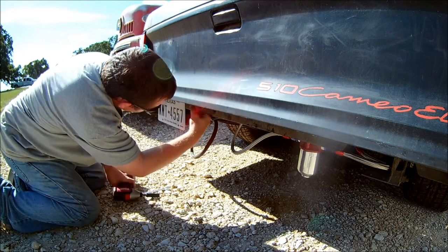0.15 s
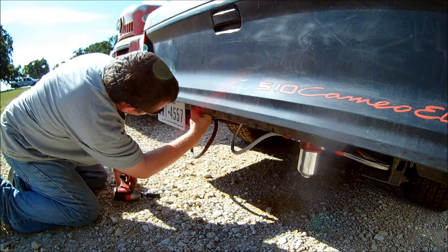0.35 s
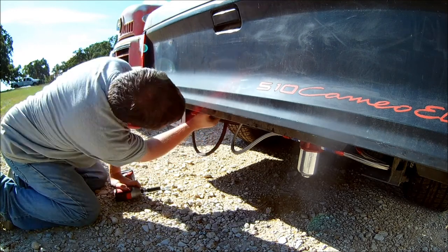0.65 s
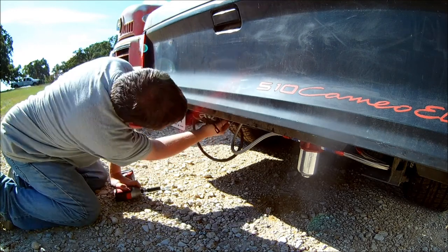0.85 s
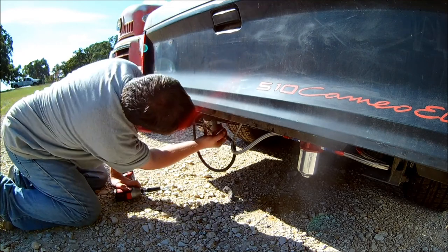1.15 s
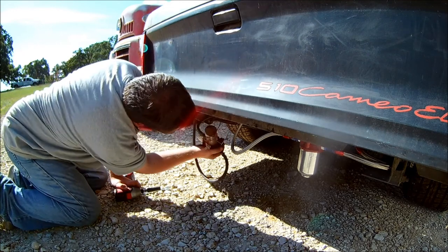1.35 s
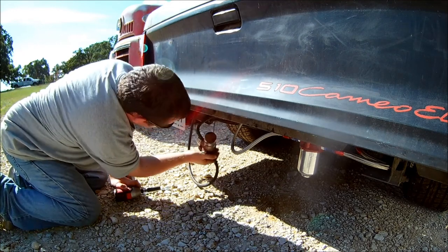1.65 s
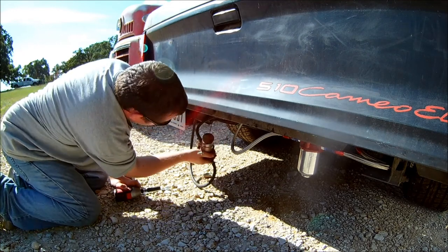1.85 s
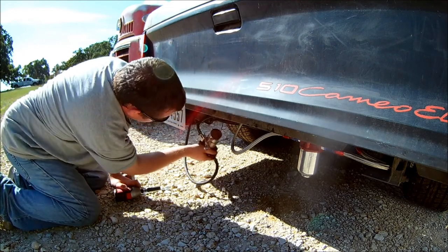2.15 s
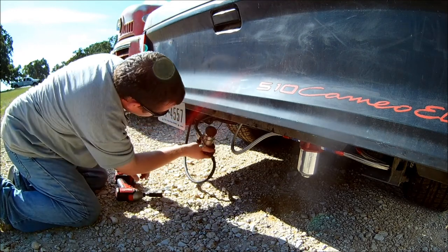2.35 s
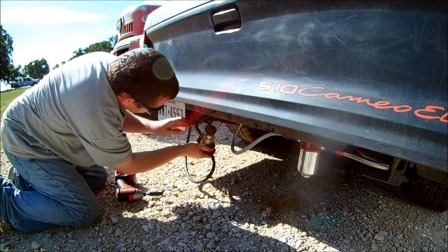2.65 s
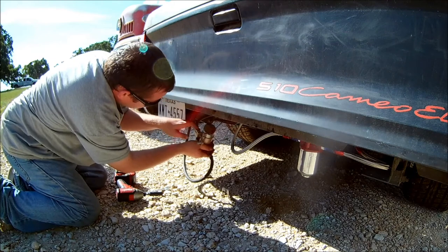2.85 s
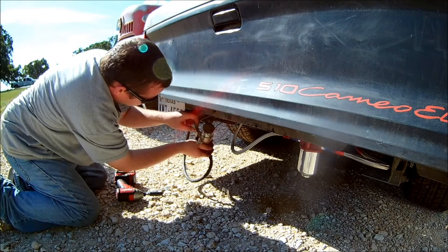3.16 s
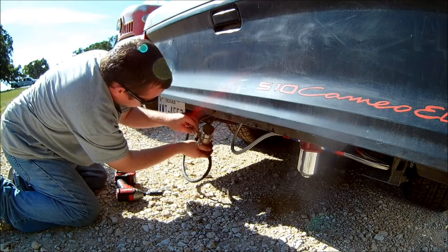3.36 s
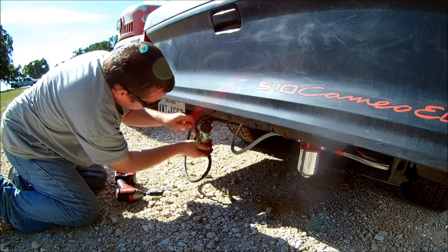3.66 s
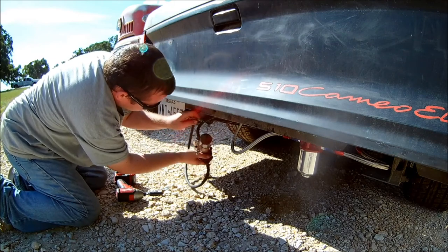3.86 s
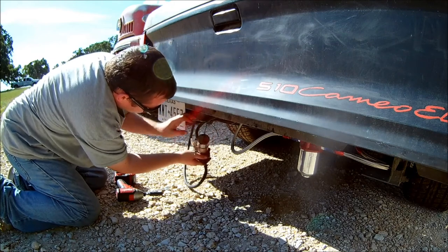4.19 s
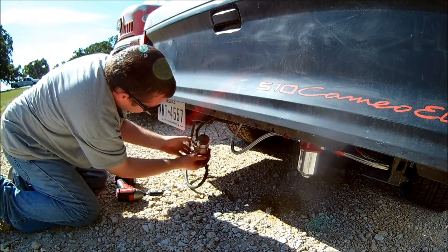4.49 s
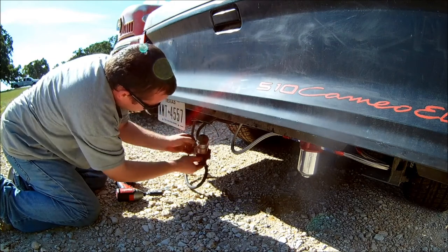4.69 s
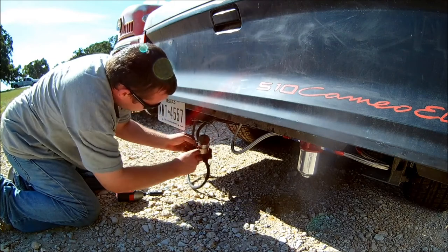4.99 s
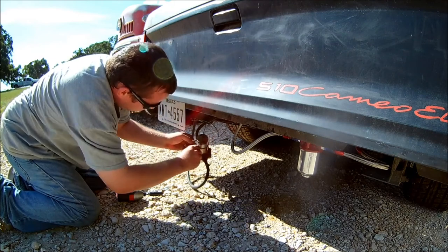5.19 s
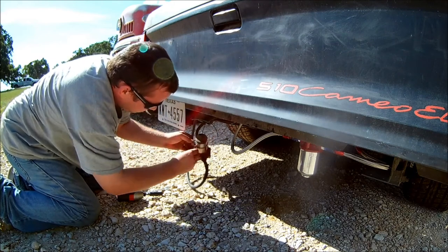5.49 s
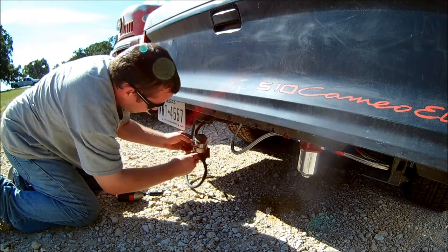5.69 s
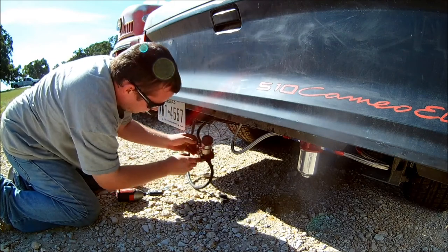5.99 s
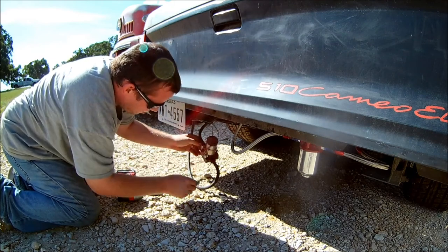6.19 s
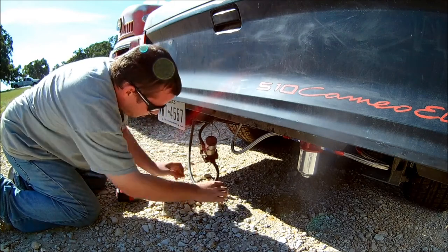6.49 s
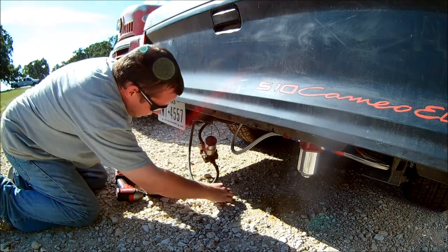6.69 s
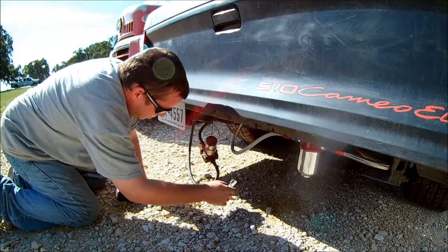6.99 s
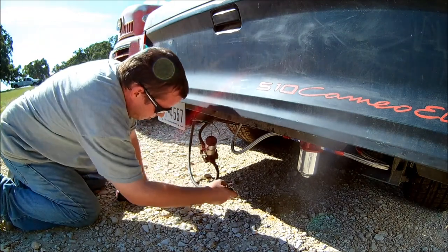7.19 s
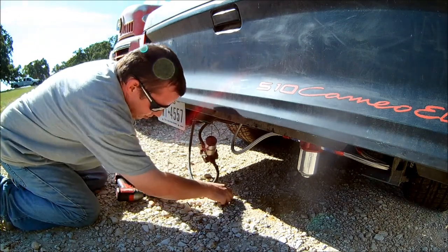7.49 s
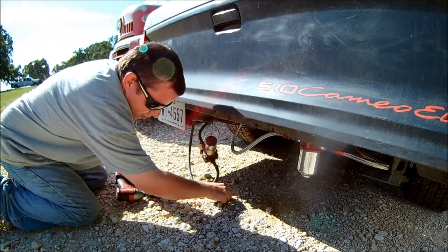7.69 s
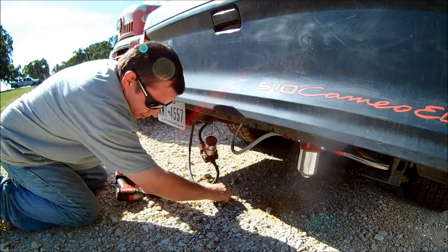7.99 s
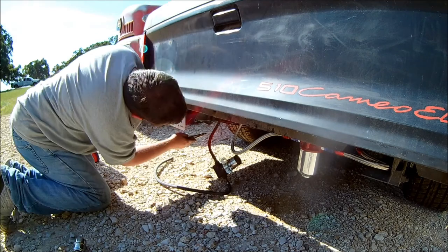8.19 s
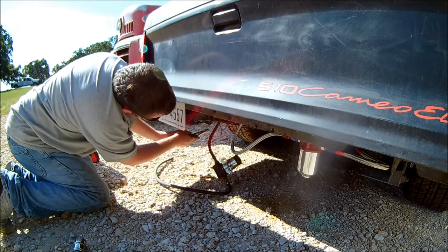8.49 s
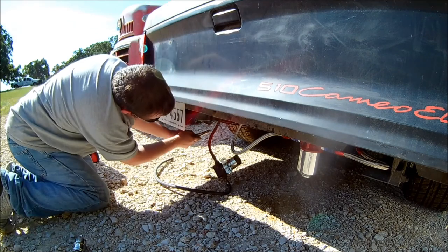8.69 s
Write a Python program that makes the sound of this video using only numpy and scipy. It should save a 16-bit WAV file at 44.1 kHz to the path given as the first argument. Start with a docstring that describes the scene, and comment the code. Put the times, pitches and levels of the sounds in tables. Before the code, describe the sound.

Outdoors behind an idling pickup, a steady low-mid engine hum with a thin whine and rushing cooling air runs throughout. Early on there is a faint tick, a light tap, then a short hoarse metal scrape ending in a hard clunk with a brief ring. Soft breeze bumps the microphone; near the end a rough gust surges over it for over a second, then the engine drone is left alone.

```python
"""Hose fitting on a pickup's bumper

Outdoors behind a parked pickup with its engine running: sine tones locked to one shaft make the hum and whine,
and pulsing noise makes the rush of cooling air. A metal fitting on a hose scrapes along the bumper (noise
with a hoarse squeal) and clunks against it (clatter and ringing modes); faint ticks are short noise bands.
Low noise bumps the microphone in wafts of breeze; one rough gust adds surging noise and pressure pulses."""
import sys
import numpy as np
from scipy import signal
from scipy.fft import rfft, irfft, next_fast_len
from scipy.io import wavfile
from scipy.ndimage import map_coordinates

SR = 44100
rng = np.random.default_rng(int(sys.argv[2]) if len(sys.argv) > 2 else 0)


def waveform_to_disk(signal):
    """Save audio, clipped to [-1, 1], as 16-bit WAV at the path in sys.argv[1]."""
    frames = np.transpose(np.atleast_2d(signal))
    scaled = np.clip(frames, -1, 1) * 32767
    samples = np.round(scaled).astype(np.int16)
    wavfile.write(sys.argv[1], SR, samples)


N = 390285  # samples, about 8.85 s


def amp(db):
    """Convert decibels to gain."""
    return 10 ** (np.asarray(db) / 20)


def unit(x):
    """Scale to rms 1."""
    return x / np.sqrt(np.mean(x ** 2) + 1e-20)


def along(points, hz):
    """Read (Hz, value) points on a log frequency axis."""
    point_hz, values = np.transpose(points)
    return np.interp(np.log(hz + 1), np.log(point_hz + 1), values)


def curves(rows):
    """Draw one value per sample for each column after the time."""
    times, *columns = np.transpose(rows)
    return [np.interp(np.arange(N) / SR, times, column) for column in columns]


def wobble(rate_hz):
    """A smooth random curve through rate_hz random knots a second."""
    knots = rng.standard_normal(int(N * rate_hz / SR) + 4)
    return map_coordinates(knots, [np.arange(N) * rate_hz / SR])


def filtered(x, response):
    """Multiply the spectrum of x by a response of frequency."""
    size = next_fast_len(len(x) + SR // 4)  # padded so the end does not wrap onto the start
    spectrum = rfft(x, size) * response(np.fft.rfftfreq(size, 1 / SR))
    return irfft(spectrum, size)[:len(x)]


def noise(spectrum, size=N):
    """Noise of rms 1 with the given colour."""
    return unit(filtered(rng.standard_normal(size), lambda hz: amp(along(spectrum, hz))))


def band(centre_hz, octaves, size):
    """Noise of rms 1 in a bell around one frequency."""
    def bell(hz):
        return np.exp(-0.5 * (np.log2((hz + 1) / centre_hz) / octaves) ** 2)
    return unit(filtered(rng.standard_normal(size), bell))


def add(track, start_s, sound):
    """Mix a sound into the track at start_s."""
    start = max(round(start_s * SR), 0)
    track[start:start + len(sound)] += sound[:N - start]


def swell(start_s, hold_s, attack_s, t60_s):
    """Linear attack, then exponential release once hold_s has passed since the start."""
    age = np.arange(N) / SR - start_s
    return np.clip(age / attack_s, 0, 1) * amp(-60 * np.maximum(age - hold_s, 0) / t60_s)


# The engine speed holds, then sags a little: time_s [s], firing_hz [Hz]
FIRING_SPEED = [(0, 129.1), (1.3, 128.4), (2.6, 128.8), (4.0, 128.6), (6.2, 129.0), (8.35, 128.9),
                (8.65, 127.9), (8.85, 128.2)]
# Shaft overtones, three firings a turn: shaft_multiple [-], level_db [dB against the drone]
SHAFT_OVERTONES = [(6, -10), (9, 0), (12, -12.5), (15, -7.8), (18, -16.5), (20, -11.8), (21, -14.5),
                   (24, -20), (27, -18), (30, -23)]
# Exhaust overtones over time: time_s [s], level_db [dB before drone_db]
DRONE_LEVEL = [(0.3, -49), (1.3, -46), (3.1, -47.5), (4.0, -47), (5.0, -48), (5.6, -48), (6.3, -50),
               (7.2, -48.5), (8.85, -47)]
# Thin whine over time: time_s [s], level_db [dB before whine_db]
WHINE_LEVEL = [(0, -60), (1.9, -61.5), (2.6, -60.5), (4.7, -61), (5.4, -64), (6.1, -61.5), (7.9, -66),
               (8.15, -63.5), (8.35, -57), (8.85, -58)]
# Cooling air over time: time_s [s], level_db [dB before air_db]
AIR_LEVEL = [(0, -43), (2.0, -44.5), (3.4, -43.5), (4.6, -44), (5.7, -44), (6.1, -42.5), (6.6, -45),
             (8.0, -44.5), (8.85, -44)]
# Colour of the cooling air: freq_hz [Hz], level_db [relative dB per Hz]
AIR_COLOUR = [(90, -18.5), (155, -8), (200, 1.5), (232, -2), (320, 2.5), (450, -2), (690, -6), (820, -7.5),
              (1100, -7), (1640, -13.5), (1770, -17.5), (1900, -18.5), (2800, -34.5), (4000, -40),
              (7000, -74)]
WAVER_DB = 0.9  # slow waver of the overtones and of the whine


def engine(boom_db=-45.5, boom_waver_db=0.2, drone_db=2.0, whine_db=2.5, air_db=0.1, shimmer_db=0.5, throb=0.05):
    """Firing tones, whine and pulsing air all follow one shaft, so their pitches drift together."""
    [firing_hz], [drone], [whine], [rush] = map(curves, (FIRING_SPEED, DRONE_LEVEL, WHINE_LEVEL, AIR_LEVEL))
    unsteady_hz = firing_hz * (1 + 0.0012 * wobble(14))
    firing = 2 * np.pi * np.cumsum(unsteady_hz) / SR  # phase in radians
    shaft = firing / 3

    def tone(order):
        return np.sqrt(2) * np.sin(order * shaft + rng.uniform(0, 2 * np.pi))

    hum = amp(boom_db + boom_waver_db * wobble(2.1)) * tone(order=3)  # the firing rate itself
    for multiple, db in SHAFT_OVERTONES:
        # moving air makes each overtone waver on its own
        waver = WAVER_DB * wobble(2.6) + shimmer_db * wobble(9.5)
        hum += amp(drone + drone_db + db + waver) * tone(order=round(multiple))
    hum += amp(whine + whine_db + WAVER_DB * wobble(6.8)) * tone(order=36)

    # the rush swells with each firing, over a random flutter
    air_flutter = amp(0.77 * wobble(110) + 0.37 * wobble(4.7))
    pulsing = unit((1 + throb * np.cos(firing)) * air_flutter)
    return hum + amp(air_db + rush) * pulsing * noise(AIR_COLOUR)


# Wafts at the microphone: start_s [s], hold_s [s], level_db [dB before buffet_db]
BREEZE_WAFTS = [(0.12, 0.075, -39.5), (0.3, 0.45, -50), (0.745, 0.061, -35.5), (0.95, 0.13, -47),
                (1.12, 0.092, -39), (1.282, 0.12, -48), (1.424, 0.12, -41), (1.658, 0.14, -41),
                (2.202, 0.6, -46), (2.83, 0.28, -41), (3.15, 0.52, -53.5), (5.88, 0.2, -43.5),
                (6.15, 0.73, -48.5), (8.255, 0.65, -47.5)]
# Colour of wind bumping the microphone, also in the gust: freq_hz [Hz], level_db [relative dB per Hz]
BUFFET_COLOUR = [(12, -22), (25, -2.5), (45, -1.5), (80, -3), (120, -9.5), (200, -17.5), (400, -33),
                 (800, -59.5), (3000, -120)]


def breeze(buffet_db=-1.0, uneven_db=4.0, calm_db=-56.5, attack_s=0.04, t60_s=0.51):
    """Light wafts buffet the microphone as low noise whose powers add, with near calm between them."""
    power = amp(calm_db) ** 2  # calm_db, like the wafts, is before buffet_db
    for start_s, hold_s, db in BREEZE_WAFTS:
        power = power + (amp(db) * swell(start_s, hold_s, attack_s, t60_s)) ** 2
    return amp(buffet_db + uneven_db * wobble(13)) * np.sqrt(power) * noise(BUFFET_COLOUR)


# Surges in the gust: centre_s [s], half_length_s [s], rise_db [dB above its steady blow, scaled per layer]
GUST_SURGES = [(6.98, 0.03, 7), (7.065, 0.038, 8.5), (7.17, 0.061, 6.5), (7.324, 0.063, 6),
               (7.447, 0.046, 5), (7.72, 0.035, 2.5), (7.866, 0.034, 1.5)]
# Colour of the mid-sized eddies: freq_hz [Hz], level_db [relative dB per Hz]
EDDY_COLOUR = [(60, 0.5), (130, 2.5), (250, 3), (400, -3), (600, -22), (1000, -32), (2000, -61.5),
               (6000, -110)]
# Colour of the smallest, brightest eddies: freq_hz [Hz], level_db [relative dB per Hz]
FLUTTER_COLOUR = [(200, -19.5), (400, 6.5), (700, -2), (1100, -10.5), (1800, -32), (3000, -52.5),
                  (7000, -100)]
GUST_START_S, GUST_END_S = 6.72, 8.165  # the release begins at the end time
GUST_ATTACK_S, GUST_T60_S = 0.14, 0.13


def gust(buffet_db=-33.5, eddy_db=-35.5, flutter_db=-49.5, steepness=2.27, buffet_follows=0.4,
         uneven_db=0.5, lump_db=2.5):
    """Wind over the microphone in surges; the harder it blows, the smaller and brighter its eddies."""
    t = np.arange(N) / SR
    surge_db = sum(db * np.exp(-((t - s) / half) ** 2) for s, half, db in GUST_SURGES)
    buffet_level = amp(buffet_db + buffet_follows * surge_db + uneven_db * wobble(19))
    buffet = buffet_level * noise(BUFFET_COLOUR)
    eddies = unit(amp(lump_db * wobble(45))) * amp(eddy_db + surge_db) * noise(EDDY_COLOUR)
    flutter_level = amp(flutter_db + steepness * surge_db)
    flutter = unit(amp(0.82 * wobble(30))) * flutter_level * noise(FLUTTER_COLOUR)
    blowing = swell(GUST_START_S, GUST_END_S - GUST_START_S, GUST_ATTACK_S, GUST_T60_S)
    return blowing * (buffet + eddies + flutter)


# Single large eddies at the microphone: centre_s [s], peak_db [dB], width_s [s]
LARGE_EDDIES = [(0.608, -28.5, 0.0019), (0.63, -23, 0.0017), (1.749, -30.5, 0.0017), (3.832, -28.5, 0.0035),
                (6.75, -20.5, .003), (6.896, -17, 0.0018), (7.041, -16, 0.002), (7.065, -14, 0.00096),
                (7.077, -15.5, 0.0015), (7.179, -16.5, 0.0034), (7.271, -16.5, 0.0027),
                (7.669, -19.5, 0.0042), (7.82, -21, 0.0025)]


def puffs():
    """Each large eddy is one push of pressure with a shallow suction around it."""
    out, t = np.zeros(N), np.arange(N) / SR
    for centre_s, db, width_s in LARGE_EDDIES:
        u = (t - centre_s) / width_s
        out += amp(db) * (2 * np.exp(-u ** 2) - np.exp(-(u / 2) ** 2))
    return out


# Small ticks and clicks: start_s [s], level_db [dB], centre_hz [Hz], width_octaves [octaves], t60_s [s]
FAINT_TICKS = [(0.22, -34, 1220, 0.54, 0.045), (.570, -38, 1000, 1.4, 0.0016),
               (.606, -56.5, 4250, 0.62, 0.018), (.662, -54.5, 3000, 0.37, 0.088),
               (2.345, -60.5, 3800, .5, .06), (5.533, -62, 3830, 0.54, .025),
               (8.18, -32.5, 900, 1.7, 0.0011), (8.265, -72, 6300, .15, 0.027),
               (8.313, -73, 6300, 0.14, 0.052)]


def ticks(soft_share=0.03):
    """Dry bursts of banded noise that die at once; the longer ones start more softly."""
    out, t = np.zeros(N), np.arange(SR // 8) / SR
    for start_s, db, centre_hz, octaves, t60_s in FAINT_TICKS:
        onset = np.minimum(t / (soft_share * t60_s), 1)
        add(out, start_s, onset * amp(db - 60 * t / t60_s) * band(centre_hz, octaves, size=len(t)))
    return out


# Drags of the fitting: start_s [s], length_s [s], level_db [dB], squeal_hz [Hz], squeal_db [dB against grit]
FITTING_DRAGS = [(0.712, 0.025, -33.5, 1060, -2), (0.729, 0.039, -25, 910, -5.5),
                 (0.769, 0.049, -32.5, 1240, -14), (0.812, 0.038, -30, 1350, -1.5),
                 (0.845, 0.036, -37, 1360, -13)]
# Colour of the rubbing grit: freq_hz [Hz], level_db [relative dB per Hz]
GRIT_COLOUR = [(70, -18), (170, -7), (290, -4), (500, -7.5), (950, -13), (1500, -18), (2100, -23.5),
               (2900, -37), (4200, -43.5), (5200, -60.5), (7200, -61), (8200, -77.5)]


def scrapes(squeal_octaves=0.25):
    """Metal sticks and slips, heard as gritty noise with a short hoarse squeal in each drag."""
    out, t = np.zeros(N), np.arange(SR // 4) / SR
    for start_s, length_s, db, squeal_hz, squeal_db in FITTING_DRAGS:
        release = amp(-60 * np.maximum(t - length_s + 0.0072, 0) / 0.07)  # starts 7.2 ms before the end
        stroke = np.minimum(t / 0.01, 1) * release
        squeal = amp(squeal_db) * band(squeal_hz, squeal_octaves, size=len(t))
        add(out, start_s, amp(db) * stroke * (noise(GRIT_COLOUR, size=len(t)) + squeal))
    return out


# Blows on the bumper: start_s [s], clatter_db [dB], ring_db [dB], free_ring_s [s]
BUMPER_BLOWS = [(.58, -47.5, -40, 0.13), (.762, -30, -28.5, 0.044), (.873, -17.5, -19.5, 0.14)]
# Ringing modes of the bumper: pitch_hz [Hz], level_db [dB against ring_db, before scatter], t60_s [s]
BUMPER_MODES = [(168, 1.5, 0.26), (201, 1.5, 0.27), (228, -16, .3), (261.8, 0, 1), (410, -5, 0.32),
                (420, -3, 0.6), (467, -9.5, 0.3), (665, -5.5, 0.23), (903, -8.5, 0.12), (975, -2.5, .2),
                (1200, -17, 0.089), (1340, -26, .2), (1400, -14.5, .2), (1600, -18.5, 0.35),
                (1920, -18.5, 0.28)]
# Colour of the clatter before it decays: freq_hz [Hz], level_db [relative dB per Hz]
CLATTER_COLOUR = [(60, -24.5), (220, -0.5), (330, -11), (450, -5), (620, -6), (950, -2), (1500, -5.5),
                  (2100, -17), (2900, -29.5), (4200, -30), (5200, -49), (7000, -54), (8200, -76)]
# Decay of the clatter by frequency: freq_hz [Hz], t60_s [s]
CLATTER_DECAY = [(150, 1), (450, 0.81), (900, 0.24), (2000, 0.22), (6000, 0.12)]
CRACK_DB, CRACK_HZ, CRACK_T60_S = -6.5, 1680, 0.05  # first contact of a blow, against its clatter


def knocks(attack_s=0.007, damped_t60_s=0.14):
    """A blow sets off metallic clatter; bumper modes build up under it and ring until the fitting settles."""
    out, t = np.zeros(N), np.arange(SR) / SR
    for start_s, clatter_db, ring_db, free_s in BUMPER_BLOWS:
        # each frequency of the clatter dies at its own rate
        hz, age, bins = signal.stft(noise(CLATTER_COLOUR, size=SR), SR, nperseg=256)
        decay = amp(-60 * age / along(CLATTER_DECAY, hz)[:, None])
        clatter = signal.istft(bins * decay, SR, nperseg=256)[1][:SR]
        crack = amp(CRACK_DB - 60 * t / CRACK_T60_S) * band(CRACK_HZ, 0.53, size=SR)
        contact = (clatter + crack) * (1 - np.exp(-t / 0.00052))

        ring = np.zeros(SR)
        for pitch_hz, db, t60_s in BUMPER_MODES:
            level = amp(db + rng.normal(0, 1) - 60 * t / t60_s)  # each blow excites the modes differently
            ring += level * np.sin(2 * np.pi * (pitch_hz * t + rng.random()))
        damping = amp(-60 * np.maximum(t - free_s, 0) / damped_t60_s)
        build_up = 1 - np.exp(-t / attack_s)
        add(out, start_s, amp(clatter_db) * contact + amp(ring_db) * ring * build_up * damping)
    return out


def scene():
    """Sum all sources dry, as in open air, on one channel."""
    return (engine() + breeze() + gust() + puffs() + ticks() + scrapes() + knocks())[None]


# Colour of the microphone hiss: freq_hz [Hz], level_db [relative dB per Hz]
HISS_COLOUR = [(2500, -10), (4500, 4.5), (6300, 2.5), (7500, -0.5), (11500, -1.5), (13200, 0.5), (15600, 1)]
TOP_HZ = 15780  # band limit of the camera's sound


def record(dry, hiss_db=-78.0):
    """The camera's microphone adds steady hiss, and nothing above the band limit is kept."""
    with_hiss = dry[0] + amp(hiss_db) * noise(HISS_COLOUR)
    return filtered(with_hiss, lambda hz: hz < TOP_HZ)[None]


dry = scene()
out = record(dry)
waveform_to_disk(out)
```